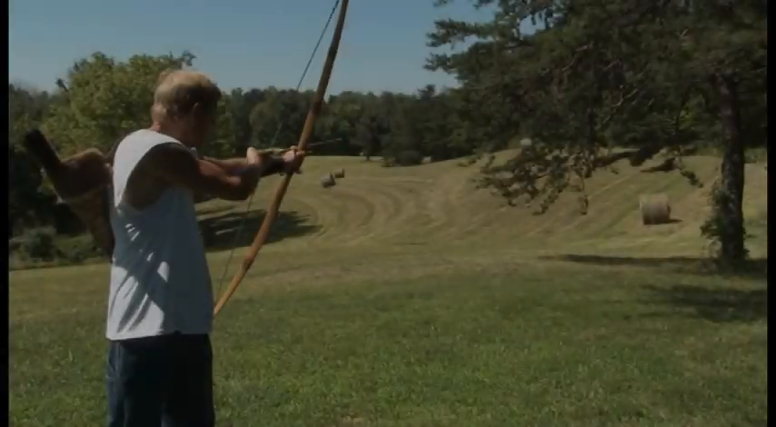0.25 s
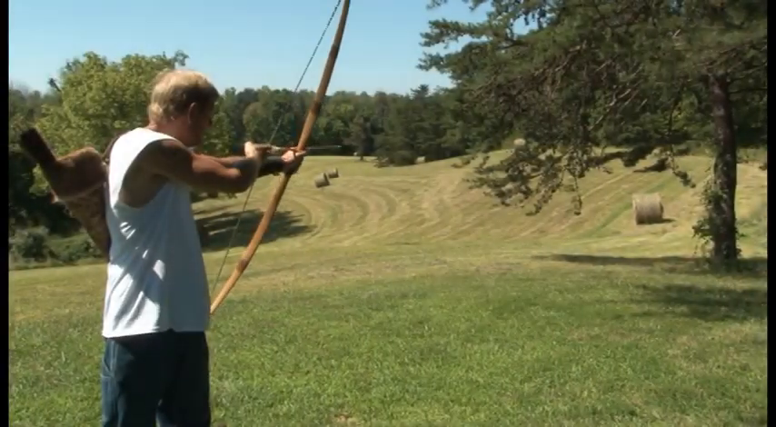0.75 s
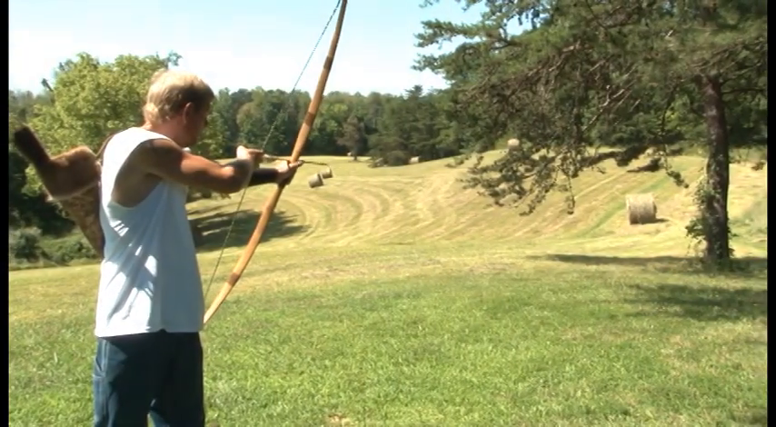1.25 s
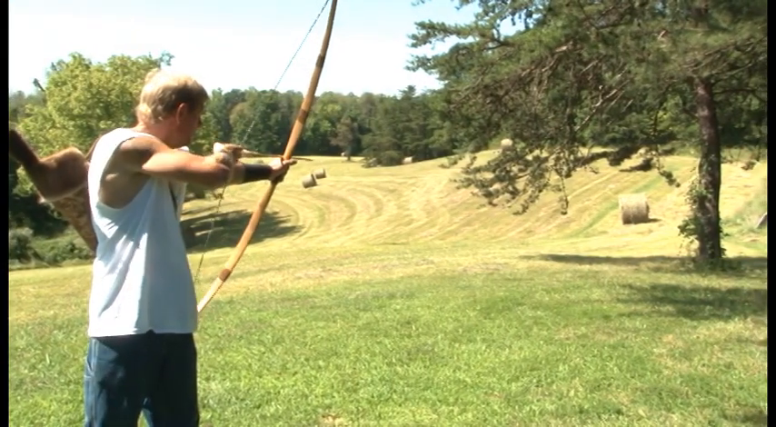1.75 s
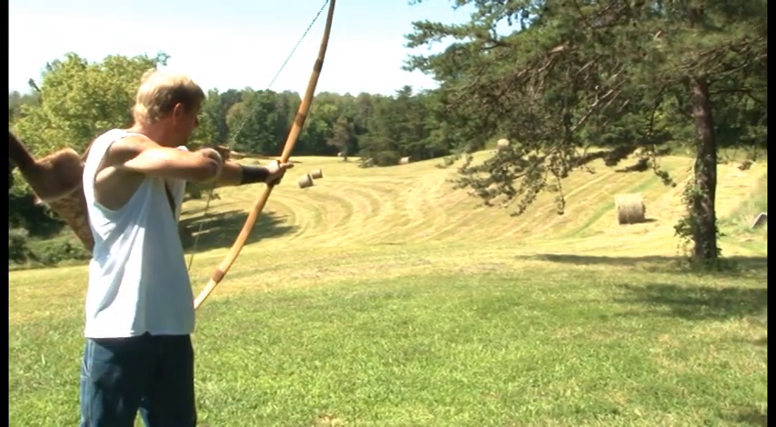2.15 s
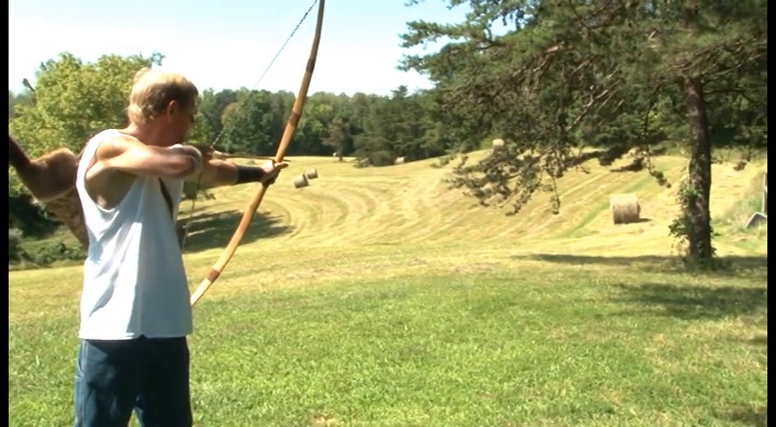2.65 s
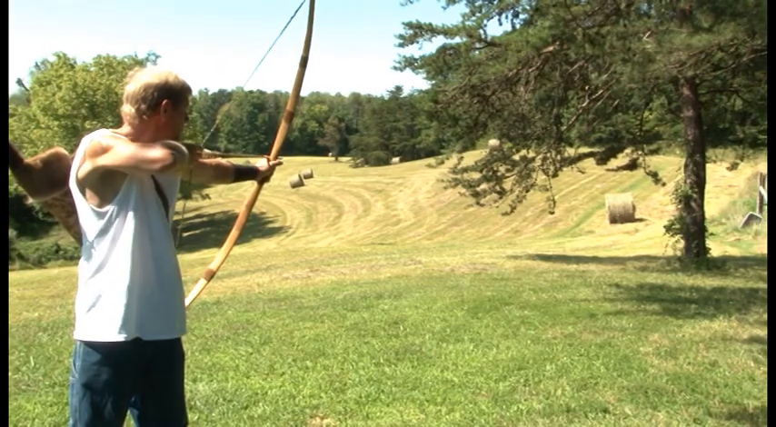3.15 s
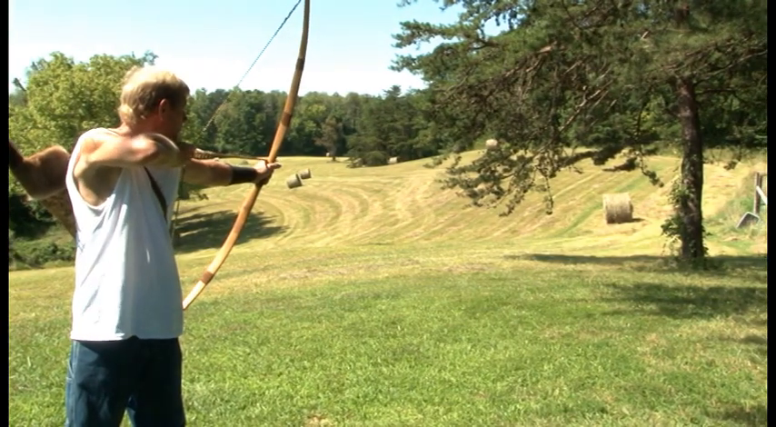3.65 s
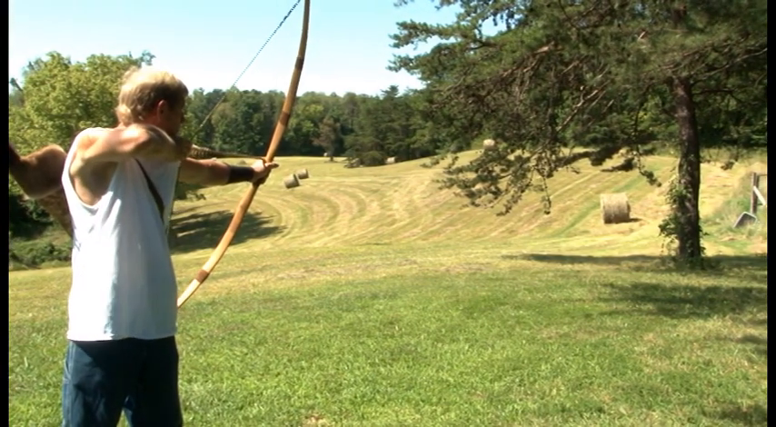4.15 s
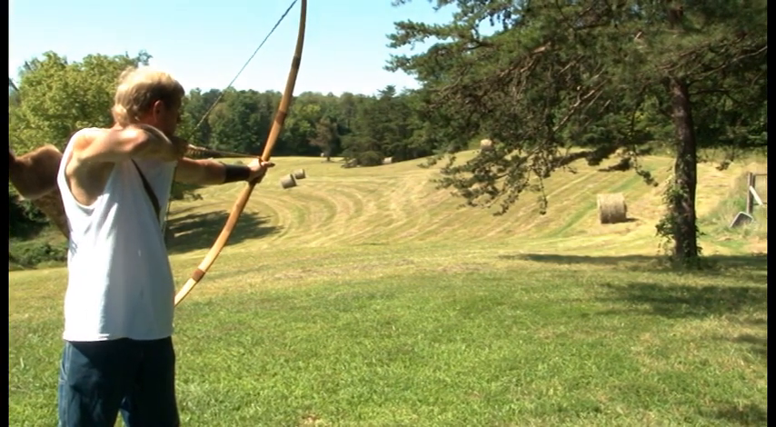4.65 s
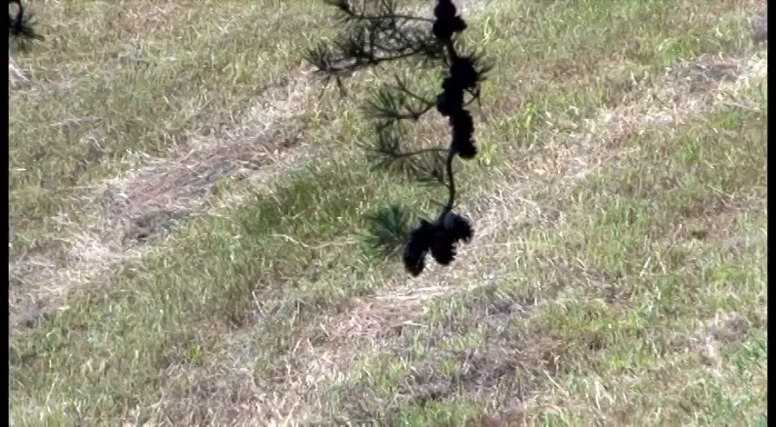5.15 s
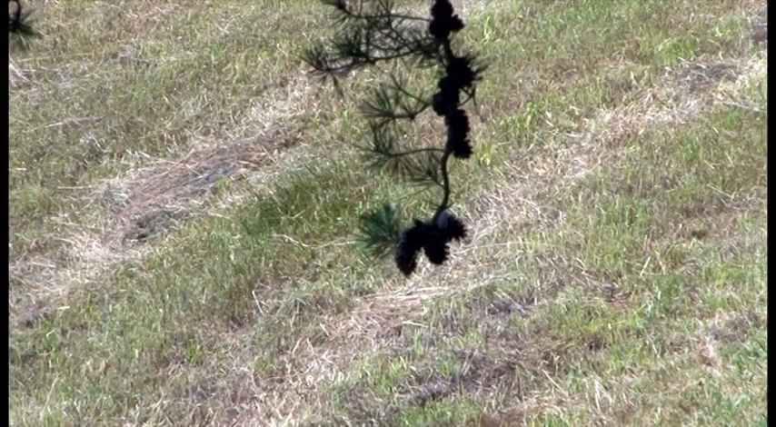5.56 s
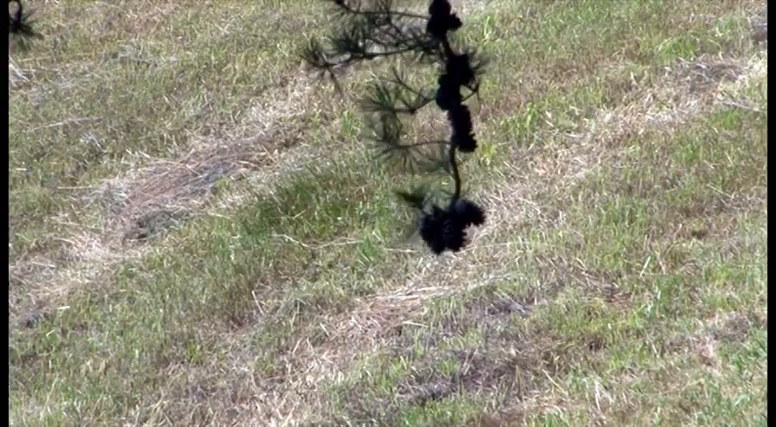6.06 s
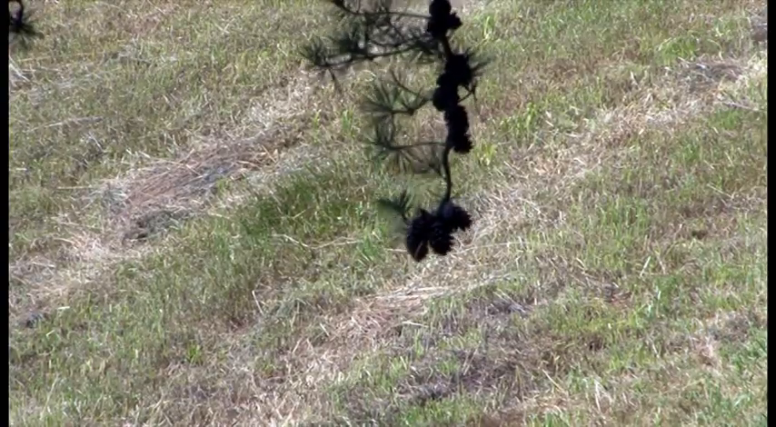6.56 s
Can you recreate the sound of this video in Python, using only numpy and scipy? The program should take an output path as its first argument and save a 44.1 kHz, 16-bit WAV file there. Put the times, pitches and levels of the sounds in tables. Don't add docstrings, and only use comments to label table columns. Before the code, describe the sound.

Outdoors in summer heat, a camera's own microphone catches bright insect shimmer rising from near silence. Low gusts flutter and knock against it, with a heavy crackling thump at two seconds and more blows around three to five. A nearby cicada slows while a grasshopper's buzz becomes dry ticks. After a hard cut, the wind eases, steady thin-toned cicadas continue, and a distant machine hums beneath faint motor ticking.

```python
import sys
import numpy as np
from scipy import signal
from scipy.fft import rfft, irfft, next_fast_len
from scipy.io import wavfile
from scipy.ndimage import uniform_filter1d

SR = 44100
rng = np.random.default_rng(int(sys.argv[2]) if len(sys.argv) > 2 else 0)


def inscribe(sig):
    pcm = np.round(np.clip(np.atleast_2d(sig).T, -1, 1) * 32767)
    wavfile.write(sys.argv[1], SR, pcm.astype(np.int16))


def volts(x):
    e = np.asarray(x, float) / 20
    return 10 ** e


N = 300556
CUT_S = 5.226

# start_s, gain_db
FADE = [(0, -28.5), (.3, -20), (.7, -12), (1.1, -5.5), (1.4, -1.5), (6.82, 0.5)]
# pitch_hz, level_db (per Hz)
CHORUS = [
    [(2530, -37), (4300, -8.5), (5170, -2), (5660, -3.5), (6510, -2), (7600, 1.5), (8440, -0.5), (9000, -12.5), (14500, -29.5), (15600, -32)],
    [(2530, -28), (4300, -9.5), (5420, -5), (5910, -3), (6410, -2), (6990, 1), (7700, 3), (8910, -7.5), (14800, -28), (15600, -28)],
]


def rms_one(x):
    return x / np.sqrt(np.mean(x ** 2) + 1e-20)


def in_time(rows):
    s, *columns = np.transpose(rows)
    return [np.interp(np.arange(N) / SR, s, c) for c in columns]


def drift(rate):
    r = np.exp(-80 * np.pi * rate / SR)
    slow = signal.lfilter([1], [1, -2 * r, r * r], rng.standard_normal(N // 40 + 2002))[2000:]
    return np.interp(np.arange(N) / 40, np.arange(len(slow)), rms_one(slow))


def noise(spectrum, ragged_db=0.):
    size = next_fast_len(N)
    hz, level_db = np.transpose(spectrum)
    bins = np.arange(1, size // 2 + 2) * SR / size
    ragged = np.interp(bins, np.arange(400) * 40, rng.standard_normal(400))
    shape = volts(np.interp(np.log(bins), np.log(hz), level_db) + ragged_db * ragged)
    return rms_one(irfft(rfft(rng.standard_normal(size)) * shape, size)[:N])


def at_cut(before, after):
    share = np.clip((np.arange(N) / SR - CUT_S) / .004, 0, 1)
    return (1 - share) * before + share * after


def both_spots(spectra, ragged_db=0.):
    return at_cut(noise(spectra[0], ragged_db), noise(spectra[1], ragged_db))


def evened(x, span_s):
    return x / np.sqrt(uniform_filter1d(x ** 2, max(int(span_s * SR), 1)) + 0.016)


def ring(x, hz, t60):
    r, w = volts(-60 / (t60 * SR)), 2 * np.pi * hz / SR
    return signal.lfilter([0, np.sin(w)], [1, -2 * r * np.cos(w), r * r], x + 1e-18)


def narrow(hz, width):
    once = ring(rng.standard_normal(N), hz, 2.2 / width)
    return rms_one(ring(once, hz, 2.2 / width))


def pulses(per_s, sharp, late=0):
    cycles = np.cumsum(per_s) / SR - late
    return np.exp(sharp * (np.cos(2 * np.pi * cycles) - 1))


def bell(s, half_s):
    return np.exp(-.5 * ((np.arange(N) / SR - s) / half_s) ** 2)


def burst(hz, width_s):
    t = np.arange(-5 * width_s, 5 * width_s, 1 / SR)
    return np.exp(-.5 * (t / width_s) ** 2) * np.cos(2 * np.pi * (hz * t + rng.random()))


def add(out, s, shape):
    at = int(s * SR) - len(shape) // 2
    out[at:at + len(shape)] += shape


def blows(rows):
    out = np.zeros(N)
    for s, db, hz, half_ms in rows:
        add(out, s, volts(db) * burst(hz, half_ms / 1000))
    return out


def cicadas(main_db, low_db):
    # start_s, tymbal_cycles_per_s, share_of_chorus_power (0-1)
    singer = [(0, 363.7, .5), (1.2, 364, .5), (1.6, 363, .55), (3.0, 362, .5), (3.6, 358, .45),
              (4.2, 351, .4), (4.8, 340, .4), (5.22, 329, .35), (5.23, 329, 0), (6.82, 329, 0)]
    # pitch_hz, width_hz, level_db (against the chorus)
    whistles = [
        [(3958, 18, -27), (4984, 48, -22), (5217, 16, -21), (5786, 20, -20), (6291, 50, -15), (6520, 40, -19), (6760, 60, -15), (6911, 20, -18), (7512, 30, -18), (8536, 22, -23), (8887, 16, -29)],
        [(5180, 40, -24), (6100, 30, -28), (6500, 40, -27), (6870, 40, -24), (7230, 60, -20), (7410, 45, -20), (7545, 30, -22), (7680, 70, -18), (7810, 50, -19), (8010, 60, -20), (8900, 40, -30)],
    ]
    # pitch_hz, level_db (per Hz)
    low_chorus = [
        [(1120, -60), (1900, -26), (2570, -11), (2790, -10), (3590, -2), (3850, -1.5), (4190, -6.5), (4500, -7.5), (5850, -5), (9900, -120)],
        [(1120, -59), (1900, -51), (2130, -17), (2550, -9.5), (2700, -5), (3020, -1), (3250, 3.5), (4500, 4), (5850, -2.5), (9900, -120)],
    ]
    per_s, share = in_time(singer)
    near = near_cicada(per_s)
    solos = [sum(volts(db - 1.5 + 3 * drift(2.7)) * narrow(hz, width) for hz, width, db in spot)
             for spot in whistles]
    far = both_spots(CHORUS, ragged_db=1.0) * volts(0.053 * drift(5.2))
    main = np.sqrt(1 - share) * far + np.sqrt(share) * near + at_cut(*solos)
    low = volts(low_db + 0.64 * drift(29.0)) * both_spots(low_chorus)
    return volts(main_db - 1.42) * main + low


def near_cicada(per_s):
    throb_hz, rise_share, swell_db, delay_cycles = 47.0, .62, 3.6, .17
    body_low_hz, body_high_hz, body_jitter_hz, ring_s = 5150, 7120, 300, .0002
    buckle, snap_back = (0, 0, 0), (.55, -4.5, 350)
    pump = np.cumsum(throb_hz + .2 * drift(1.3)) / SR
    swell = np.sin(np.pi / 4 * (1 + signal.sawtooth(2 * np.pi * pump, rise_share)))
    chance = rms_one(uniform_filter1d(rng.standard_normal(N), 50))
    per_s = per_s + .3 * drift(3)
    body_hz = body_low_hz + (body_high_hz - body_low_hz) * swell + body_jitter_hz * chance
    fade, out = np.exp(-1 / (ring_s * SR)), 0
    for late, db, up_hz in [buckle, snap_back]:
        clicks = pulses(per_s, sharp=4.0, late=late + delay_cycles * swell)
        gate = signal.lfilter([1], [1, -fade], clicks)
        tone = np.sin(2 * np.pi * np.cumsum(body_hz + up_hz) / SR)
        out = out + volts(db + 2 * chance[::-1]) * gate * tone
    return rms_one(volts(swell_db * swell) * out)


def steady_singers(main_db):
    # start_s, clicks_per_s
    click_rates = [
        [(5.22, 185.1), (5.52, 185.33), (5.82, 185.57), (6.0, 185.63), (6.3, 185.63), (6.58, 185.3), (6.82, 185.1)],
        [(5.22, 156.4), (5.7, 156.45), (6.0, 156.7), (6.2, 157.0), (6.55, 157.5), (6.82, 157.6)],
    ]
    # multiple, level_db (over the chorus around it)
    overtones = [
        [(27, 3), (28, 3), (31, 4), (32, 5), (33, -1), (35, 2), (37, 5), (38, 6), (39, 5), (40, 4), (41, 4), (42, 3), (43, 2), (45, 1), (46, 8), (47, 0), (48, 7), (49, 1), (50, 8), (52, 3), (53, 3), (54, 6), (55, 3), (56, 1), (58, 5), (59, 2), (61, 2)],
        [(33, 2), (35, 3), (39, 2), (40, 1), (44, 3), (46, 6), (47, 0), (48, 3), (49, 4), (50, 0), (53, 3), (54, 4), (60, 3)],
    ]
    below_chorus_db, waver_db = -21.5, 2.5
    out, start = np.zeros(N), int(CUT_S * SR)
    hz, level_db = np.transpose(CHORUS[1])
    for rate, lines in zip(click_rates, overtones):
        cycles = np.cumsum(in_time(rate)[0][start:]) / SR
        for k, db in lines:
            around_db = np.interp(np.log(k * rate[0][1]), np.log(hz), level_db)
            line_db = db + around_db + waver_db * drift(3)[start:]
            out[start:] += volts(line_db) * np.sin(2 * np.pi * (k * cycles + rng.random()))
    return at_cut(0, volts(main_db + below_chorus_db) * out)


def grasshopper():
    # start_s, level_db
    buzz = [(0, -48), (1.1, -48.5), (1.39, -45), (2.1, -52.5), (2.6, -47.5), (3.83, -50), (3.85, -56),
            (4.9, -51), (5.2, -49), (6.1, -63), (6.82, -73)]
    # start_s, peak_db
    wing_ticks = [(3.8372, -32), (3.9204, -41), (4.0104, -39), (4.1096, -40), (4.2098, -33), (4.3144, -44),
                  (4.4129, -35), (4.5241, -35), (4.6404, -37), (4.7596, -39), (4.875, -44)]
    # pitch_hz, level_db (per Hz)
    rasp = [(7500, -29), (9200, 6.5), (10500, 1.5), (12000, -6.5), (14500, -13), (15700, -19)]
    strokes_hz = 112.2 + 0.77 * drift(3.2)
    gate = volts(in_time(buzz)[0]) * pulses(strokes_hz, sharp=0.36) * 1.86
    for s, db in wing_ticks:
        gate += volts(db - 9.0) * bell(s + .002, 0.0027)
    return gate * noise(rasp)


def wind():
    # start_s, strength_db, large_eddy_extra_db
    steady_wind = [(0, -46.5, 10), (.36, -44.5, 7), (.55, -51, 5.5), (.7, -51, 13), (1.0, -48, 8),
                   (1.5, -46.5, -8.5), (1.9, -47.5, 9.5), (2.14, -48.5, 4.5), (2.6, -58.5, 15),
                   (3.1, -51, 6), (3.6, -47.5, 6), (4.1, -50, -3), (4.5, -49.5, -9), (4.95, -53, 7.5),
                   (5.12, -47, 19), (5.23, -56, 10), (5.8, -63, 6), (6.82, -60.5, 4)]
    # centre_s, peak_db, half_hold_s
    gusts = [(0.355, -46, 0.0093), (0.78, -51, 0.19), (1.055, -46, 0.011), (1.216, -38.5, 0.05),
             (1.517, -43, 0.037), (1.805, -34.5, 0.0085), (2.012, -26, 0.016), (2.33, -33, 0.021),
             (2.55, -37.5, 0.051), (2.728, -42, 0.041), (2.905, -37, .005), (3.119, -36, 0.1),
             (3.32, -52, .1), (3.632, -33, 0.0099), (3.87, -33.5, 0.025), (4.108, -31, 0.039),
             (4.405, -47, 0.086), (4.82, -35.5, 0.018), (4.95, -34.5, 0.017), (5.108, -35, .01),
             (5.232, -40, .02), (5.578, -49.5, 0.069), (5.743, -44, 0.011), (5.846, -44, .005),
             (5.936, -50, .01), (6.14, -48, 0.075), (6.4, -39.5, 0.14), (6.72, -47.5, 0.12)]
    # pitch_hz, level_db (per Hz)
    buffet = [(10, -20), (20, -4), (38, 1.5), (50, 0.5), (65, -16), (100, -81)]
    # pitch_hz, level_db (per Hz)
    flutter = [(30, -82), (48, 3.5), (60, -3), (100, -11.5), (120, -13), (150, -52), (250, -65)]
    # pitch_hz, level_db (per Hz)
    rumble = [
        [(70, -50), (110, -10.5), (125, 0.5), (200, 0.5), (238, -7), (265, -18), (450, -34), (800, -40)],
        [(70, -56), (105, -14), (130, -9), (150, -19), (167, -20), (250, -26.5), (340, -31), (800, -64)],
    ]
    # pitch_hz, level_db (per Hz)
    spray = [(90, -14), (150, -2), (260, -15.5), (450, -24), (800, -37)]
    lull_db, gust_fall_db_per_s = -6, 190
    calm_cut = 0.65
    t = np.arange(N) / SR
    steady_db, large_db = in_time(steady_wind)
    rumble_db = steady_db + in_time(FADE)[0]
    buffet_db = rumble_db + lull_db + 5.7 * drift(9.6)
    for s, db, hold_s in gusts:
        flank_s = np.maximum(abs(t - s) - hold_s, 0)
        buffet_db = np.maximum(buffet_db, db - gust_fall_db_per_s * flank_s)
    shake = evened(noise(buffet), 0.063)
    middle = signal.sosfiltfilt(signal.butter(1, [44, 66], "band", fs=SR, output="sos"), shake)
    out = volts(buffet_db) * at_cut(shake, shake - calm_cut * middle)
    out += volts(rumble_db + large_db + 3.8 * drift(22.0)) * evened(noise(flutter), 0.042)
    out += volts(rumble_db + 1.74 * drift(20)) * evened(both_spots(rumble), 0.0373)
    spray_db = -53 + 0.99 * (buffet_db + 33.0) + 2.53 * drift(30)
    return out + volts(spray_db) * noise(spray)


def thumps():
    # centre_s, peak_db, pitch_hz, half_length_ms
    large_eddies = [(0.246, -41, 85, 4.4), (0.371, -36.5, 97, 4.7), (1.175, -34, 62, 13),
                    (1.281, -28.5, 68, 13), (1.937, -27, 79, 5.7), (1.978, -24, 79, 2.7),
                    (2.005, -14, 123, 3.8), (2.04, -15, 71.4, 6.5), (2.312, -27.5, 84, 4.8),
                    (2.99, -29.5, 85, 3.2), (3.138, -27, 94.5, 8.3), (3.165, -24.5, 65, 18.5),
                    (3.228, -31, 83, 4.3), (3.467, -29.5, 103, 7.9), (3.567, -20.5, 82, 3.6),
                    (3.635, -26, 85, 2.6), (3.852, -30.5, 74, 6.4), (3.925, -29.5, 84.5, 5.7),
                    (4.068, -25, 81, 7.6), (4.139, -28.5, 71, 8.8), (4.41, -38, 78.5, 13),
                    (4.164, -25, 105, 4), (4.948, -27.5, 75, 3.7), (5.018, -26.5, 74, 3.7),
                    (5.097, -23, 70, 13), (5.127, -21, 83, 4.5), (5.163, -28, 87, 3.1),
                    (5.206, -23, 110, 1.55), (5.217, -20.5, 94, 4.5), (6.455, -30.5, 59.6, 8.5)]
    # centre_s, peak_db, pitch_hz, half_length_ms
    knocks = [
        (1.988, -42, 1250, 0.45),
        (2.146, -39, 560, 1.2),
        (2.146, -47, 1150, .45),
        (2.155, -54, 1080, 2.2),
    ]
    return blows(large_eddies) + blows(knocks)


def snaps():
    # centre_s, slap_db, spike_db, spike_hz
    port_bursts = [(.256, -54, -59, 290), (0.332, -54, -51, 290), (0.35, -44, -58, 320),
                   (.37, -46, -53, 350), (0.381, -47, -47.5, 350), (1.99, -25.5, -33, 416),
                   (1.997, -25, -31, 500), (2.005, -22, -24.5, 348), (2.023, -32, -39, 390),
                   (2.036, -25, -37, 350), (2.047, -40, -56, 350), (2.879, -57, -45, 398),
                   (2.993, -39, -53, 320), (3.003, -48, -40, 420), (3.081, -58, -43, 400),
                   (3.179, -39, -61, 300), (3.555, -40, -54, 320), (3.563, -35, -42, 400),
                   (3.686, -60, -48, 500), (3.81, -58, -43, 373), (4.079, -37, -44, 320),
                   (4.1, -36.5, -45, 366), (4.138, -43, -46, 320), (4.158, -43, -54, 320),
                   (5.097, -37, -53, 340), (5.113, -39, -41.5, 380), (5.196, -51, -48, 350),
                   (5.209, -31, -49, 330), (5.223, -35, -46, 400)]
    out = np.zeros(N)
    spread = np.exp(rng.normal(0, 1, (len(port_bursts), 2)) * 0.14)
    for (s, slap_db, spike_db, spike_hz), (slap_bend, crack_bend) in zip(port_bursts, spread):
        add(out, s, volts(slap_db) * burst(177 * slap_bend, .00306))
        add(out, s, volts(spike_db) * burst(spike_hz, .00118))
        add(out, s, volts(spike_db - 13.5) * burst(1150 * crack_bend, .00043))
    return out


def eddies():
    # centre_s, peak_db, pitch_hz, half_length_ms
    more_eddies = [(1.42, -40.5, 70, 15), (1.755, -33.5, 80, 7), (2.09, -30, 65, 9), (2.205, -32, 75, 5.9),
                   (2.601, -38.5, 95, 13), (2.7, -36, 80, 7.5), (2.894, -38, 70, 6.4), (3.05, -40, 70, 8),
                   (3.801, -36, 110, 6.8), (4.191, -38, 74.6, 9.4), (4.761, -37, 90, 6),
                   (5.391, -37, 80, 9.2), (5.1, -31, 110, 5.8), (.3, -60, 260, 6), (2.38, -54.5, 300, 12),
                   (3.19, -43, 230, 8), (3.47, -47, 250, 6), (4.1, -43.5, 352, 4.2), (4.14, -45, 310, 5),
                   (4.27, -47, 190, 9.1)]
    return blows(more_eddies)


def lens_motor():
    # start_s, end_s, tick_db
    motor_runs = [
        (0, .87, -54.5),
        (2.31, 4.92, -55),
        (5.23, 5.62, -56.5),
        (5.93, 6.82, -54.5),
    ]
    # pitch_hz, level_db, t60_s
    housing = [(910, -17.5, 0.058), (955, -8.5, 0.037), (1058, -10.5, 0.036), (1220, -34, 0.016)]
    # centre_s, level_db
    slews = [(.83, -66), (2.37, -66), (2.501, -65), (5.41, -64), (6.019, -66), (6.35, -71)]
    frame_hz, jitter_s, return_lag_s, return_gain = 29.97, .0001, .00026, .75
    drive, shape = np.zeros(N), burst(1015, 0.00055)
    for s in np.arange(.0212, N / SR - .02, 1 / frame_hz):
        running = sum(volts(db) for start, end, db in motor_runs if start <= s < end)
        size = running * volts(-19.5 + 0.71 * rng.standard_normal())
        s += jitter_s * rng.standard_normal()
        if int(s * frame_hz) % 2:
            s, size = s + return_lag_s, size * return_gain
        add(drive, s, size * shape)
        add(drive, s + 0.00677, size * volts(-7.5) * shape[::-1])
    out = sum(volts(db) * ring(drive, hz, t60) for hz, db, t60 in housing)
    for s, db in slews:
        add(out, s, volts(db + 6.0) * (burst(954, .018) + .5 * burst(1068, .018)))
    return out


def bright_swell():
    # pitch_hz, level_db (per Hz)
    swell_colour = [(9000, -31), (11500, 4), (14500, -2), (15700, -12)]
    return volts(-53) * bell(1.36, .09) * noise(swell_colour)


def engine():
    # pitch_hz, level_db
    hum = [(72, -55), (123.5, -59.5), (144.5, -65), (446.8, -76.5)]
    out = 0
    for hz, db in hum:
        level = volts(db + 5.5 + 1.3 * drift(4.5))
        cycles = np.cumsum(hz * (1 + 0.0012 * drift(1.4))) / SR
        out = out + level * np.sin(2 * np.pi * cycles)
    return at_cut(0, out)


def air():
    # pitch_hz, level_db (per Hz)
    field_air = [(120, -25), (200, -16), (276, -5), (313, -0.5), (455, -4), (654, -7), (757, -6.5),
                 (1300, -10.5), (2400, -11.5), (3120, -30), (5280, -120)]
    return volts(-61.5 + 0.29 * drift(20.0)) * noise(field_air)


def slips():
    # centre_s, level_db, low_hz, high_hz
    hiss_patches = [(2.92, -37, 5600, 7100), (3.595, -42, 5100, 6500), (5.5, -44, 4100, 5900),
                    (5.685, -46, 4100, 5400), (5.825, -47, 4500, 5900), (6.615, -48, 4100, 5400)]
    out, size = np.zeros(N), 1800
    for s, db, low_hz, high_hz in hiss_patches:
        sos = signal.butter(6, [low_hz, high_hz], "band", fs=SR, output="sos")
        band = signal.sosfilt(sos, rng.standard_normal(size))
        add(out, s, volts(db - 2) * rms_one(band) * signal.windows.tukey(size, .6))
    return out * [[1], [-1]]


def scene():
    # start_s, level_db
    effort = [(0, -28.5), (1.2, -29.5), (1.55, -27.5), (2.1, -29), (4.4, -30.5), (5.22, -32), (5.23, -34),
              (6.82, -35)]
    fade_db, = in_time(FADE)
    main_db, = in_time(effort)
    low_db = -42 - 0.36 * np.arange(N) / SR
    field = cicadas(main_db, low_db) + grasshopper() + air() + lens_motor()
    gusty = wind() + thumps() + snaps() + eddies()
    mono = volts(fade_db) * field + gusty + bright_swell() + engine() + steady_singers(main_db)
    return np.array([mono, mono])


def roll_off(x):
    return signal.sosfilt(signal.butter(12, 15760, fs=SR, output="sos"), x)


def record(dry):
    bins = np.arange(N // 2 + 1) * SR / N
    top = irfft(rfft(dry) * (bins > 15150), N)
    block_start = np.clip((np.arange(N) - 806) // 1024 * 1024 + 806, 0, N - 1)
    missing = (drift(14) + .4 * drift(1.2) > .1)[block_start]
    dropped = uniform_filter1d(1. * missing, 300)
    return roll_off(dry - dropped * top + slips())


dry = scene()
out = record(dry)
inscribe(out)
```